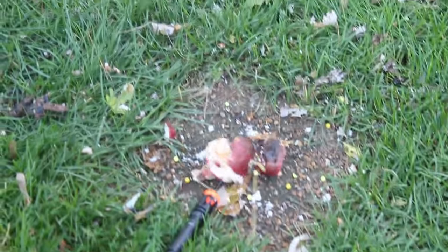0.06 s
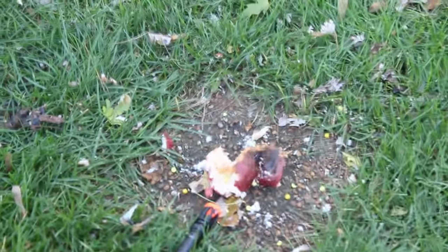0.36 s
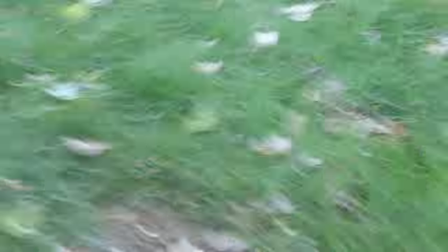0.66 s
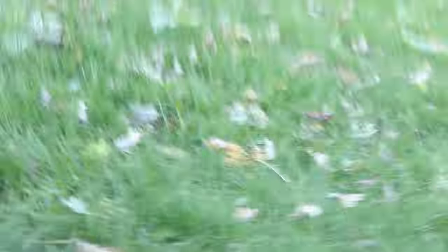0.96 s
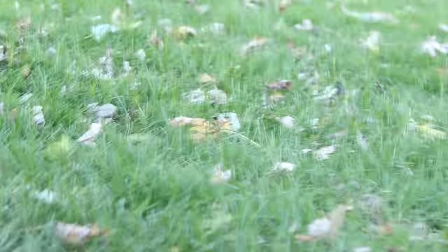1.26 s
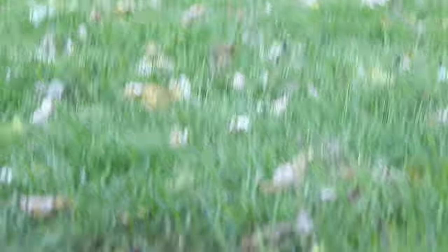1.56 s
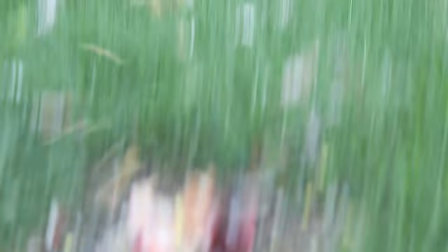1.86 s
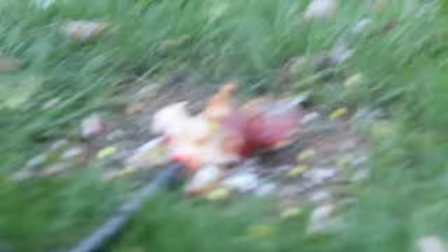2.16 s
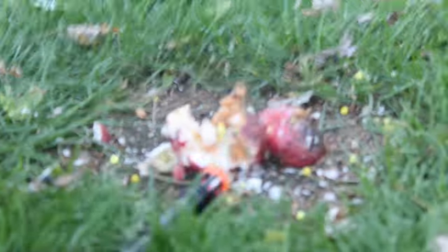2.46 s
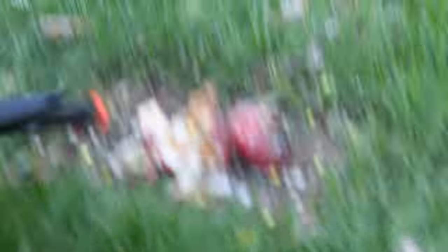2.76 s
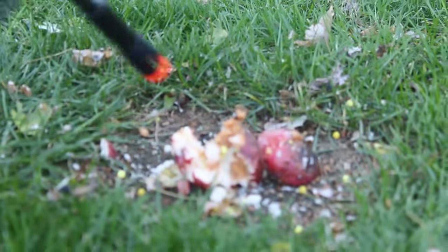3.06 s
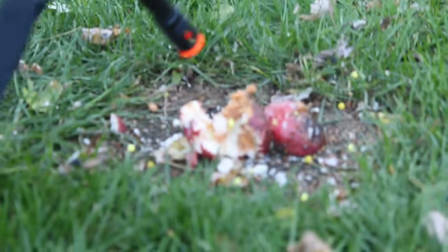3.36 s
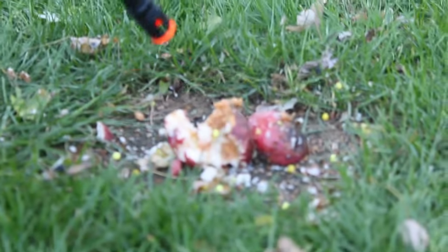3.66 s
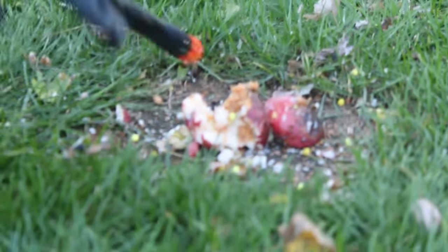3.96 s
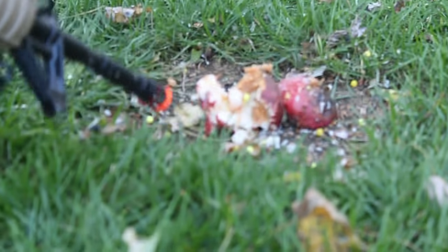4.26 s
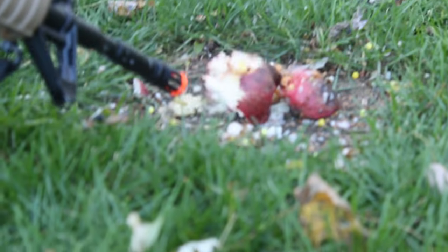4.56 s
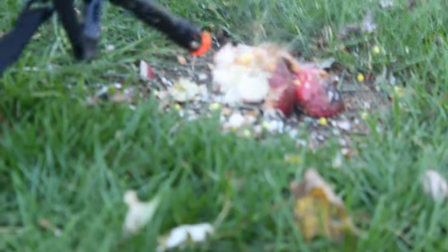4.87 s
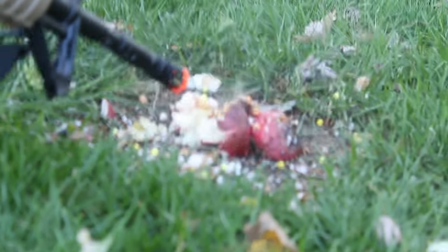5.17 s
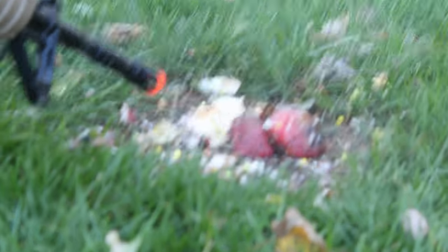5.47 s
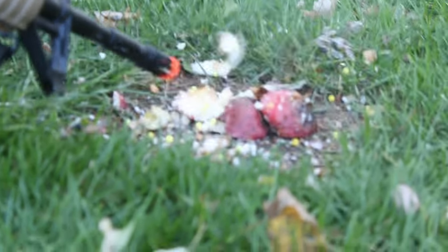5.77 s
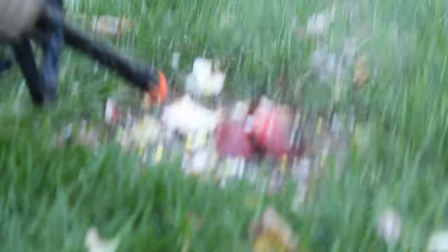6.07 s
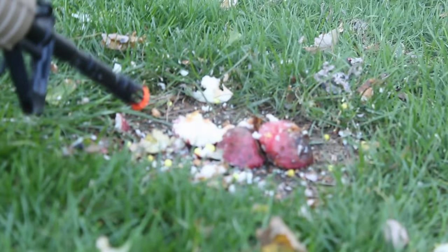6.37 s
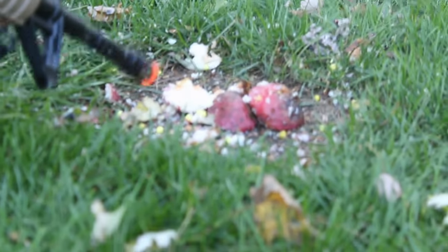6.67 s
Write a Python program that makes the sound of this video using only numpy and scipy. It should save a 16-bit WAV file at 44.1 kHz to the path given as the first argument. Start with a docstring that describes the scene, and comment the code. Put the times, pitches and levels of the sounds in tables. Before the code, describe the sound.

Close by in a quiet yard, a full-auto pellet gun chatters in six brief bursts and then fires continuously to the end. Every shot is a bright piston crack with a light hollow knock, and the motor's buzzy whine rises and sags between shots. In the pauses the gears coast down, the trigger clicks and hands rustle faintly. A very low outdoor hum lies underneath, with no echo.

```python
"""Electric pellet gun on a lawn

Six short bursts and a long one are fired close by, over a quiet yard. For every shot a motor winds a
piston back against its spring, so the gear whine sags; then the piston slams home. The gears turn once
a shot, so their pitch follows the rate of fire, and they coast down after each short burst. The grip
sets the colour of the blows; between bursts come trigger clicks and soft, grainy rustles."""
import sys
import numpy as np
from scipy import signal
from scipy.fft import rfft, irfft
from scipy.io import wavfile
from scipy.ndimage import uniform_filter1d, minimum_filter1d

SR = 44100
rng = np.random.default_rng(int(sys.argv[2]) if len(sys.argv) > 2 else 0)


def master(y):
    """Save y as 16-bit WAV."""
    cut = np.clip(np.atleast_2d(y).T, -1, 1)
    pcm = np.round(cut * 32767)  # scale
    wavfile.write(sys.argv[1], SR, pcm.astype(np.int16))


N = 304775
BAND_LIMIT_HZ = 16000
# piston blows: (time [s], relative crack level [dB], relative thump level [dB])
SHOTS = [(0.0692, -4, -34), (0.17, -1, -33), (0.2696, -1, -28), (0.5841, 1, -27), (0.6917, 1, -33.5),
         (0.7889, -4.5, -27.5), (0.8914, -0.5, -32), (1.1861, 2, -25), (1.2935, 0, -29.5),
         (1.3939, -1.5, -34), (1.492, -1, -29), (1.8238, -3.5, -28), (1.929, -3.5, -30.5),
         (2.027, -4.5, -30.5), (2.1279, -3.5, -34.5), (2.3349, -3, -26), (2.4407, -3, -25.5),
         (2.5429, -2, -28), (3.1153, 3, -29), (3.2275, -2.5, -32.5), (3.3294, -3.5, -34),
         (3.4299, -4, -34.5), (3.5309, -3, -33), (3.6332, -2.5, -33.5), (4.0736, 3, -29), (4.1802, -1, -34),
         (4.2813, -5.5, -37.5), (4.3798, -3.5, -37), (4.4785, -4.5, -40), (4.579, -5, -37),
         (4.6806, -1.5, -36), (4.7826, -3.5, -36.5), (4.8861, -3, -36), (4.9891, -4.5, -37),
         (5.094, -2.5, -39), (5.2001, -3.5, -39.5), (5.3059, -3.5, -36.5), (5.4125, -4.5, -37),
         (5.519, -5.5, -39), (5.6261, -3, -36.5), (5.7324, -4, -36), (5.8377, -3.5, -36),
         (5.9448, -4.5, -37), (6.0508, -3, -34), (6.157, -3, -35.5), (6.2622, -3.5, -34),
         (6.3699, -3.5, -34), (6.4742, -3.5, -33), (6.577, -3, -32), (6.6817, -2.5, -32.5),
         (6.7858, -4, -33), (6.8918, -3.5, -34)]


def amp(db):
    """Amplitude ratio of a level in decibels."""
    return 10 ** (np.asarray(db) / 20)


def unit(x):
    """Normalisation to an rms of 1."""
    return x / np.sqrt(np.mean(x ** 2) + 1e-20)


def unit_energy(x):
    """Normalisation of a transient to the energy of 10 ms at an rms of 1."""
    return x / np.sqrt(np.sum(x ** 2) / (SR / 100) + 1e-20)


def level_at(spectrum, hz):
    """Interpolation of a spectrum on a logarithmic frequency axis."""
    f, db = np.transpose(spectrum)
    return np.interp(np.log(hz + 1), np.log(f + 1), db)


def add(mix, s, sound):
    """Superposition of a sound on the mix from time s."""
    part = mix[max(round(s * SR), 0):][:len(sound)]
    part += sound[:len(part)]


def colour(x, spectrum):
    """Zero-phase filtering by multiplication of spectra."""
    return irfft(rfft(x) * amp(level_at(spectrum, np.fft.rfftfreq(len(x), 1 / SR))), len(x))


def wander(hz):
    """Random modulation: noise of rms 1, low-passed at hz."""
    f = np.fft.rfftfreq(N, 1 / SR)
    return unit(irfft(rfft(rng.standard_normal(N)) / (1 + (f / hz) ** 4), N))


def grains(per_s, spread_db):
    """A Poisson process: sparse impulses of uneven size."""
    size = amp(spread_db * np.minimum(rng.exponential(1, N), 4))
    return unit(size * rng.choice([-1, 1], N) * (rng.random(N) < per_s / SR))


def ring(modes, t, scatter=.02):
    """Free vibration: a sum of damped modes, slightly detuned at every blow."""
    detune = 1 + scatter * rng.standard_normal(len(modes))
    return sum(amp(db - 60 * t / t60) * np.sin(2 * np.pi * hz * d * t)
               for (hz, db, t60), d in zip(modes, detune))


def yard(noise_db=-60, drone_db=-64, drone_hz=125):
    """Low ambient noise and a distant drone, randomly modulated in frequency and amplitude."""
    # outdoor noise spectrum: (frequency [Hz], relative level [dB])
    spectrum = [(18, -23), (30, -6.5), (137, -1), (267, -6), (320, -11.5), (592, -19.5), (1380, -10.5),
                (1790, -17.5), (2140, -23), (2700, -22), (3320, -19), (6810, -27), (14000, -67)]
    phase = 2 * np.pi * np.cumsum(drone_hz * (1 + .092 * wander(29))) / SR
    drone = np.sin(phase) * amp(2 * wander(2.85))
    return amp(noise_db) * unit(colour(rng.standard_normal(N), spectrum)) + amp(drone_db) * drone


def rustles_and_bumps(rustle_db=-1, still_db=-65, attack_s=.0054, decay_s=.018, bump_hz=68):
    """Amplitude-modulated grainy noise gives soft rustles; dull bumps excite one low mode."""
    # soft grainy rustles between bursts: handling, and gears still turning faintly near 2.2 s
    # (start [s], duration [s], level [dB])
    rustles = [(0.325, 0.063, -51.5), (0.98, .1, -51.5), (1.686, .05, -47), (2.18, 0.11, -42),
               (2.628, 0.045, -54), (2.84, .18, -53), (3.9, 0.058, -62)]
    # rustle spectrum: (frequency [Hz], relative level [dB])
    spectrum = [(240, -56), (400, -16), (791, -6), (3010, -2.5), (3830, -2), (5030, -5), (7700, -5),
                (15000, -46)]
    # dull bumps: (time [s], level [dB])
    bumps = [(.735, -32), (.765, -47.5)]
    t = np.arange(N) / SR
    envelope = amp(still_db) + sum(
        amp(db) * np.exp(-np.maximum(s - t, 0) / attack_s - np.maximum(t - s - length, 0) / decay_s)
        for s, length, db in rustles)
    noise = (rng.standard_normal(N) + 1.2 * grains(360, spread_db=1)) * amp(2.2 * wander(60))
    out = amp(rustle_db) * envelope * unit(colour(noise, spectrum))
    for s, db in bumps:
        add(out, s, amp(db) * ring([(bump_hz, 0, .09)], t[:4096], scatter=.05))
    return out


def casing(x, hz, width_hz, lift_db):
    """Impact response of the casing: a bright spectrum with one resonance standing out."""
    # crack spectrum: (frequency [Hz], gain [dB])
    spectrum = [(450, -9), (1100, -7.5), (1700, 0), (3000, -0.5), (4500, 1), (6000, -1.5), (7600, 3),
                (9000, -8), (11000, -18), (13300, -28), (14600, -31), (16000, -38)]
    f = np.fft.rfftfreq(len(x), 1 / SR)
    resonance = amp(lift_db) / (1 + 2j * (f - hz) / width_hz)
    return irfft(rfft(colour(x, spectrum)) * (1 + resonance), len(x))


def clicks(rise_s=.0003, decay_s=.0044, lead_s=.01):
    """Impact excitation: small parts of the mechanism snap against the casing."""
    # trigger, latch and gear clicks: (time [s], peak level [dB], resonance [Hz])
    impacts = [(0.369, -33.5, 1510), (0.556, -18.5, 2850), (0.946, -12, 4930), (0.997, -24, 2680),
               (1.003, -30, 3530), (1.013, -31, 2770), (1.09, -29, 2680), (1.221, -26, 4230),
               (1.586, -32, 4126), (1.671, -33, 3504), (1.855, -18, 2054), (2.178, -22, 3040),
               (2.644, -26.5, 5850), (2.651, -24.5, 2530), (2.937, -27, 1680), (3.043, -30.5, 2340),
               (3.733, -32, 3890), (3.886, -36.5, 3125), (3.902, -37, 2464), (3.944, -37, 5700),
               (3.96, -34, 4460)]
    out = np.zeros(N)
    t = np.maximum(np.arange(2048) / SR - lead_s, 0)
    envelope = np.exp(-t / decay_s) * (1 - np.exp(-t / rise_s))
    for s, db, hz in impacts:
        tick = casing(rng.standard_normal(len(t)) * envelope, hz, width_hz=690, lift_db=11)
        add(out, s - lead_s, amp(db) * tick / abs(tick).max())
    return out


def grip(s):
    """Contact with the hands alters how the gun vibrates: its four settings at time s."""
    # (time [s], gear level [dB], casing resonance [Hz], relative knock [dB], relative rebound [dB])
    grips = [(.25, -31.5, 4600, 4.5, -11), (.585, -36, 1750, 5.5, -25), (.69, -26.5, 3010, 9.5, -11),
             (.9, -30, 3230, 0.5, -24), (1.19, -24, 2674, 4.5, 6.5), (1.4, -27, 2355, 0.5, 0),
             (2.05, -28.5, 2445, 3, -13), (2.4, -27, 2080, 2.5, -1.5), (3.11, -26, 2365, 7.5, 0),
             (3.43, -30, 2264, 5.5, -3), (3.55, -29, 4300, 6.5, -2), (4.18, -27.5, 4055, 5.5, 12),
             (4.29, -30.5, 3890, 0, -13), (5.35, -30, 3410, 2.5, -18), (6.16, -31, 3740, -4, -7),
             (6.26, -31, 3850, 3.5, 0.5), (6.9, -29.5, 4800, 4.5, -9)]
    times, *columns = np.transpose(grips)
    return [np.interp(s, times, column) for column in columns]


def spin_up(shot, start, top_hz, sag, db):
    """The motor accelerates from rest until the spring loads it."""
    # (progress [0-1], speed over top speed [ratio], share of sag [0-1], rattle [dB], whine [dB])
    stages = [(0, 0.43, 0.085, -17.5, -22.5), (.26, 0.8, 0, -2, -10.5), (.4, 0.97, 0.11, -2.5, -4.5),
              (0.549, 0.98, 0.092, -3.5, -2.5), (0.721, 0.98, .35, -1.5, -5.5),
              (.93, 0.92, 0.96, -4.5, -4.5), (.98, 1, 0.89, 12.5, -25)]
    at_rest = (start - .003, 200, -75, -110)
    return [at_rest] + [
        (start + u * (shot - start), top_hz * speed * (1 - sag * load), db + rattle, db + whine)
        for u, speed, load, rattle, whine in stages]


def winding(previous, shot, lag_s, teeth_per_shot=231):
    """Mesh frequency varies inversely with the shot period and sags as the spring is compressed."""
    # (share of cycle [0-1], speed over top speed [ratio], rattle [dB], whine [dB])
    stages = [(.02, .6, -4.5, -37.5), (.13, .85, -4, -31), (.24, 0.99, -3.5, -9), (.28, 0.97, 5.5, -16),
              (.43, .915, 2, 5.5), (.62, .785, 0.5, 1.5), (.81, .64, -6.5, -0.5), (.915, .58, -4.5, -8),
              (.955, .57, -10.5, -14.5)]
    top_hz = teeth_per_shot / (shot - previous - lag_s)
    db = grip(shot)[0]
    return [(previous + u * (shot - previous), top_hz * speed, db + rattle, db + whine)
            for u, speed, rattle, whine in stages]


def coast(shot, release, hz, db, coast_s, db_per_decade=44.5, whine_db=-17):
    """The gears run on until the release; then friction slows them evenly and they fade with speed."""
    # (progress [0-1], speed over speed at release [ratio], relative level [dB])
    run_on = [(0.273, .92, -5.5), (0.601, 1.08, -1.5)]
    path = [(shot + u * (release - shot), speed, level) for u, speed, level in run_on]
    path += [(release + coast_s * (1 - speed), speed, db_per_decade * np.log10(speed))
             for speed in np.linspace(1, .1, 10)]
    return [(s, hz * speed, db + level, db + level + whine_db) for s, speed, level in path]


def gear_motion(catch_up_s=.0095):
    """Kinematics of the gears: mesh frequency [Hz], rattle [dB] and whine [dB] at every sample."""
    # trigger pulls: (time [s], top mesh frequency [Hz], sag under load [0-1], gear level [dB])
    pulls = [(.487, 770, .08, -35), (1.091, 850, .07, -27.5), (1.701, 932.5, 0.04, -35),
             (2.212, 1239, 0.13, -31), (3.043, 590, 0.02, -33), (3.961, 1174, 0.17, -27.5)]
    # trigger releases: (time [s], mesh frequency [Hz], gear level [dB], coasting time [s])
    releases = [(.316, 1900, -28, .055), (.951, 2100, -25.5, .048), (1.53, 1950, -26, .095),
                (2.165, 1500, -34, .048), (2.596, 1950, -24.5, .058), (3.678, 1750, -31.5, .14)]
    shots = [s for s, *_ in SHOTS]
    rows, lag_s = [], 0
    previous = 2 * shots[0] - shots[1]  # the first burst is already under way
    for shot in shots:
        pulled = [pull for pull in pulls if previous < pull[0] < shot]
        rows += spin_up(shot, *pulled[0]) if pulled else winding(previous, shot, lag_s)
        lag_s = catch_up_s if pulled else 0  # time lost gathering speed after a burst's first shot
        previous = shot
    for release in releases:
        last_shot = max(s for s in shots if s < release[0])
        rows += coast(last_shot, *release)
    times, *columns = np.transpose(sorted(rows))
    return [np.interp(np.arange(N) / SR, times, column) for column in columns]


def shell(x, dense_db=-7, ring_s=.002):
    """Broad resonances colour the gearbox; dense small ones make a gliding tone flutter."""
    # shell resonances: (frequency [Hz], bandwidth [Hz], gain [dB])
    resonances = [(565, 150, -2), (2080, 430, -12), (3950, 180, -23.5), (5500, 950, -34),
                  (6960, 760, -13.5)]
    f, t = np.fft.rfftfreq(N, 1 / SR), np.arange(1024) / SR
    tail = rng.standard_normal(len(t)) * np.exp(-t / ring_s) * (t > .001)
    dense = 1 + amp(dense_db) * rfft(tail / np.linalg.norm(tail), N)
    broad = 1 + sum(amp(db) / (1 + 2j * (f - hz) / width) for hz, width, db in resonances)
    return irfft(rfft(x) * broad * dense, N)


def gears(rattle_db=-3, whine_db=-6, jitter=.00785, flutter_db=2.2, strain_hz=1300):
    """Periodic tooth contact gives a harmonic whine and a clatter; an eccentric pinion modulates both."""
    # mesh harmonics: (order [multiple], level [dB])
    harmonics = [(1, -3), (2, -1.5), (3, 1), (4, 0.5), (5, -2), (6, -0.5), (7, 2.5), (8, -15)]
    # radiation of gear tones by the casing: (frequency [Hz], gain [dB])
    radiation = [(400, 4), (750, 14), (1000, 10), (1350, 8), (2000, -2.5), (2450, 6.5), (3100, 1.5),
                 (3800, 1.5), (4400, 4), (5300, 0.5), (6400, -7.5), (7900, -2), (10000, -29), (14000, -54)]
    # spectrum of tooth impacts: (frequency [Hz], relative level [dB])
    rattle_spectrum = [(100, -29), (280, -23.5), (400, -4.5), (580, -6.5), (1000, -5.5), (1600, 1),
                       (2100, 4.5), (3000, 6), (4000, 6), (5500, 6.5), (6400, 4), (7900, 2.5), (9500, -8),
                       (12000, -25.5), (15000, -36)]
    hz, rattle_level, whine_level = gear_motion()
    tooth_phase = 2 * np.pi * np.cumsum(hz * (1 + jitter * wander(266))) / SR
    shaft_phase = tooth_phase / 10  # ten teeth on the pinion
    runout = .12 * np.sin(shaft_phase)
    backlash = .055 * wander(700)  # loose teeth land early or late, fraying the high harmonics
    phase = tooth_phase + backlash + runout
    tilt_db_per_octave = 2 / (1 + (hz / strain_hz) ** 10)  # a slow, straining motor buzzes brighter
    whine = np.zeros(N)
    for k, db in harmonics:
        level = db + level_at(radiation, k * hz) + tilt_db_per_octave * np.log2(k / np.e)
        gain = amp(level + flutter_db * wander(81)) * (k * hz < BAND_LIMIT_HZ)
        whine += gain * np.cos(k * phase + 2 * np.pi * rng.random())
    strikes = (1 + .95 * np.cos(tooth_phase)) * (1 + .17 * np.cos(shaft_phase))
    clatter = strikes * (rng.standard_normal(N) + .46 * grains(1500, spread_db=-1.5))
    rattle = unit(colour(clatter, rattle_spectrum))
    return shell(amp(whine_db + whine_level) * whine + amp(rattle_db + rattle_level) * rattle)


def body_knock(t, db, open_db=3.5, dulling=1.8):
    """Modal ringing of the plastic body; a firm grip weakens the upper modes first."""
    # body modes: (frequency [Hz], level [dB], time to fall 60 dB [s])
    modes = [(805, 0, 0.025), (1017, 0, 0.015), (1174, -11, 0.018)]
    upper_db = dulling * (db - open_db)
    upper_modes = [(hz, level + upper_db, t60) for hz, level, t60 in modes[1:]]
    return amp(db) * unit_energy(ring([modes[0]] + upper_modes, np.maximum(t, 0)))


def cylinder_thump(t, recoil_db=-12, recoil_lead_s=.00405, recoil_width_s=.00049):
    """The body recoils as the spring lets go; then the air in the cylinder resonates."""
    # air modes: (frequency [Hz], level [dB], time to fall 60 dB [s])
    modes = [(188, 12, 0.026), (413, 12, 0.031), (463, 6.5, 0.022), (573, -9, 0.025)]
    u = (t + recoil_lead_s) / recoil_width_s
    recoil = u * np.exp(-u ** 2 / 2)
    return amp(recoil_db) * unit_energy(recoil) - unit_energy(ring(modes, np.maximum(t, 0)))


def piston_crack(t, ring_hz, rebound_db, rebound_s=.0022, settle_s=.0045, decay_s=.0014):
    """Inelastic impact: the piston hits the cylinder head and bounces twice, exciting the casing."""
    # prominence of the casing resonance: (frequency [Hz], gain [dB])
    ring_lift = [(1800, 6), (2250, -3.5), (2700, 4), (3150, 11), (3700, 8.5), (4700, -1.5)]
    timing = 1 + .14 * rng.standard_normal(2)
    blows = [(0, 0), (rebound_s * timing[0], rebound_db), (settle_s * timing[1], rebound_db / 2 - 9)]
    power = sum(amp(db) ** 2 * (t >= at) * np.exp(-2 * abs(t - at) / decay_s) for at, db in blows)
    power += amp(-21) ** 2 * np.exp(-2 * abs(t) / np.where(t > 0, .0018, .002))  # scrape, then buzz
    burst = np.sqrt(power) * rng.choice([-1, 1], len(t))
    return unit_energy(casing(burst, ring_hz, width_hz=800, lift_db=level_at(ring_lift, ring_hz)))


def piston(crack_db=-14.5, thump_db=1.1, knock_db=2.5, seat_s=.0006, lead_s=.01, cutoff_hz=115):
    """Each stroke turns the spring's energy into a crack, a thump and a knock."""
    out = np.zeros(N)
    t = np.arange(4096) / SR - lead_s
    for s, crack_level, thump_level in SHOTS:
        _, ring_hz, knock_level, rebound_db = grip(s)
        crack = amp(crack_level + crack_db) * piston_crack(t, ring_hz, rebound_db)
        thump = amp(thump_level + thump_db) * cylinder_thump(t)
        knock = amp(thump_level + knock_db) * body_knock(t, knock_level)
        add(out, s + seat_s - lead_s, crack + thump + knock)
    # a small body radiates little bass
    return signal.sosfilt(signal.butter(1, cutoff_hz, "highpass", fs=SR, output="sos"), out)


def over_lawn(x, reflection_gain=1, dull_hz=1500, beam_hz=6000):
    """Directivity beams the treble; a dull ground reflection, half a period late, cuts a notch."""
    # pose of the gun: (time [s], notch frequency [Hz], reflection strength [0-1], treble gain [dB])
    poses = [(0, 1118, 0.16, -5.5), (0.548, 990, 0.58, -10.5), (.75, 870, 0.5, -1), (1.1, 990, 1, 1.5),
             (1.498, 1000, 0.6, 1), (2.3, 827.3, 0.59, -2), (3.099, 750, 0.66, -1.5),
             (3.7, 723.6, 0.7, -2.5), (4.3, 560.4, 0.8, 0), (6.15, 558.1, 0.6, 1), (6.3, 607.4, 0.99, 2),
             (6.9, 600, 1, -1)]
    s, notch_hz, strength, treble_db = np.transpose(poses)
    t, f = np.arange(N) / SR, np.fft.rfftfreq(N, 1 / SR)
    dull, below_beam = (irfft(rfft(x) / (1 + (f / edge) ** 4), N) for edge in (dull_hz, beam_hz))
    direct = below_beam + amp(np.interp(t, s, treble_db)) * (x - below_beam)
    delay_s = .5 / np.interp(t, s, notch_hz)
    reflection = np.interp(t, s, strength) * np.interp(t - delay_s, t, dull)
    return direct + reflection_gain * reflection


def scene():
    """Superposition of the gun, its ground reflection and the quiet yard, in mono."""
    gun = over_lawn(piston()) + over_lawn(gears(), reflection_gain=.35)
    return (gun + clicks() + rustles_and_bumps() + yard())[None]


def record(dry, bass_hz=56, knee_db=-6, squeeze=.037):
    """The microphone sheds deep bass; peaks are gently compressed, then clipped and band-limited."""
    thin = signal.sosfilt(signal.butter(2, bass_hz, "highpass", fs=SR, output="sos"), dry)
    allowed_gain = np.minimum(1, amp(knee_db) / (abs(thin) + 1e-9)) ** squeeze
    gain = uniform_filter1d(minimum_filter1d(allowed_gain, size=60), size=40)
    clipped = np.clip(thin * gain, -1, 1)
    lowpass = signal.firwin(255, BAND_LIMIT_HZ, window=("kaiser", 8), fs=SR)
    return signal.oaconvolve(clipped, lowpass[None], "same")


dry = scene()
out = record(dry)
master(out)
```